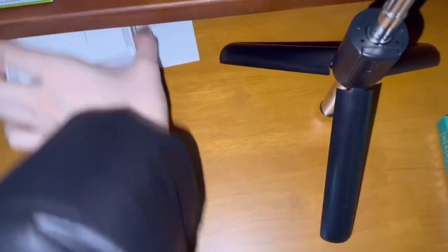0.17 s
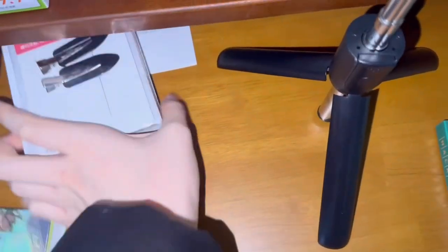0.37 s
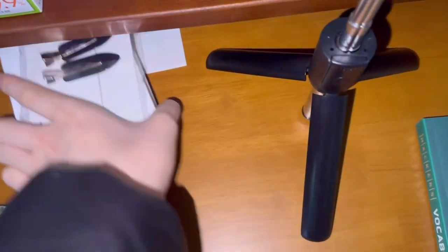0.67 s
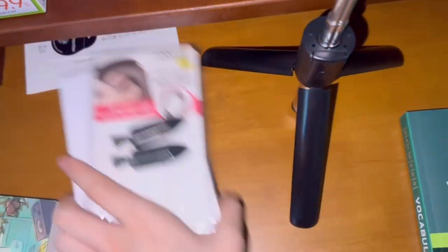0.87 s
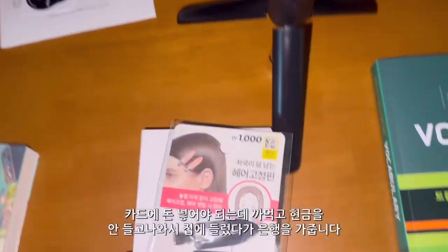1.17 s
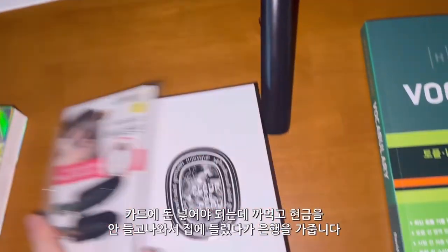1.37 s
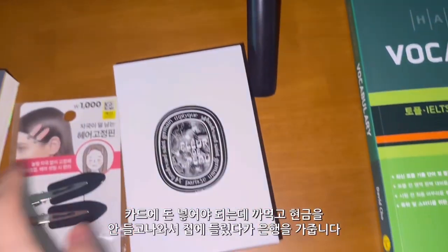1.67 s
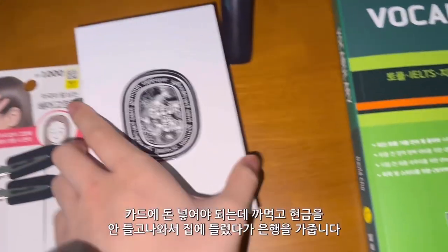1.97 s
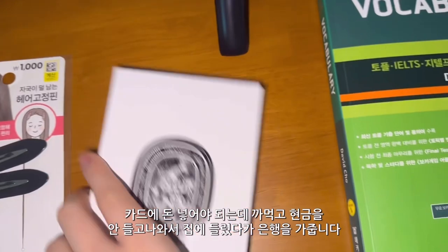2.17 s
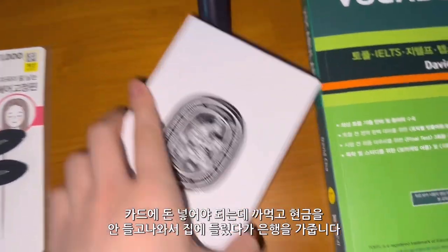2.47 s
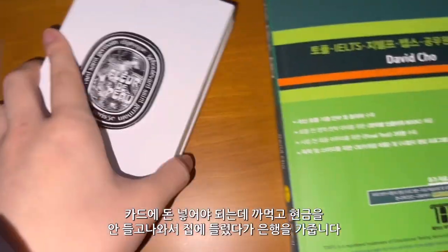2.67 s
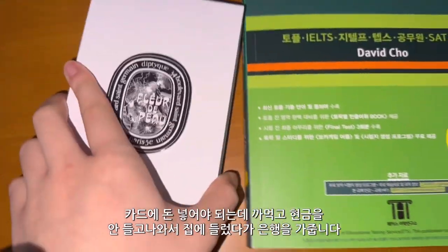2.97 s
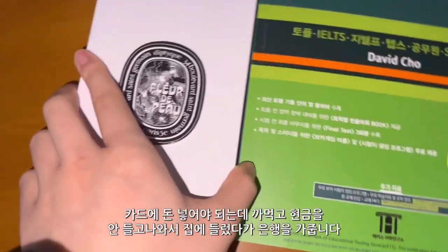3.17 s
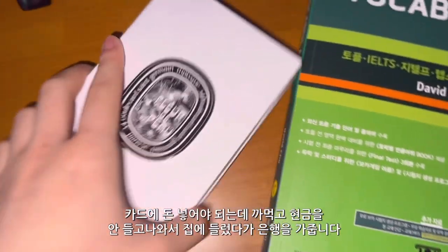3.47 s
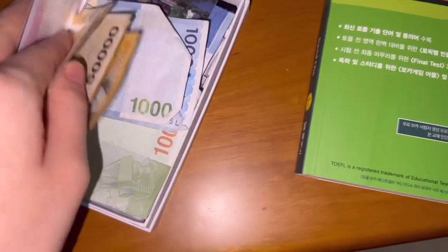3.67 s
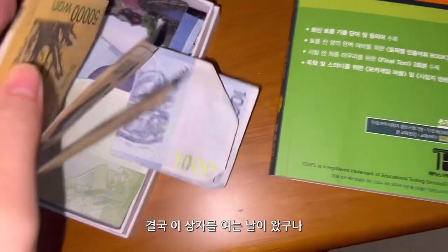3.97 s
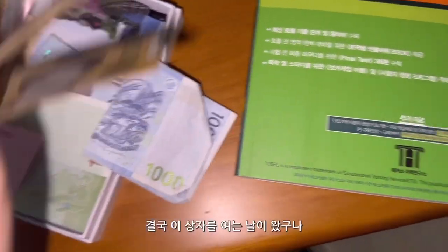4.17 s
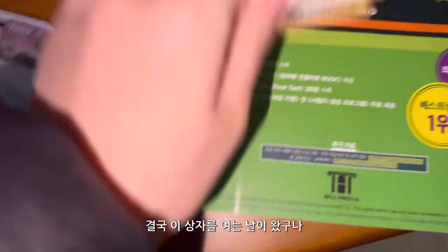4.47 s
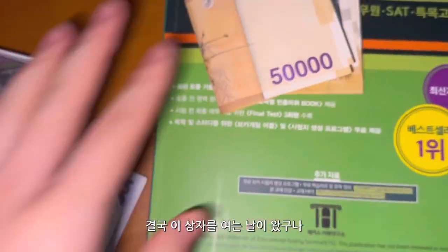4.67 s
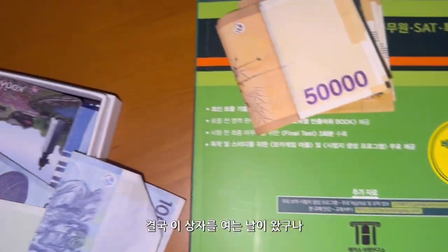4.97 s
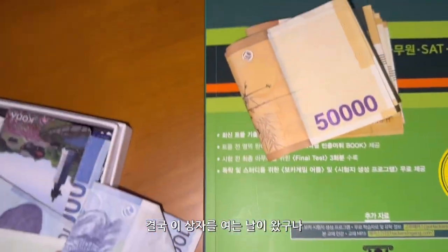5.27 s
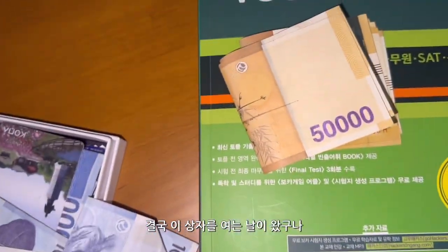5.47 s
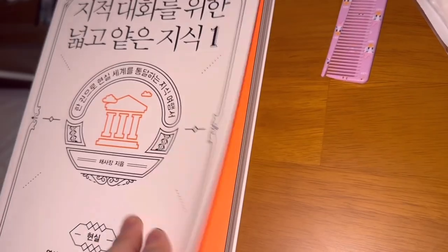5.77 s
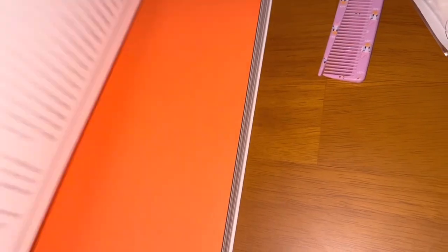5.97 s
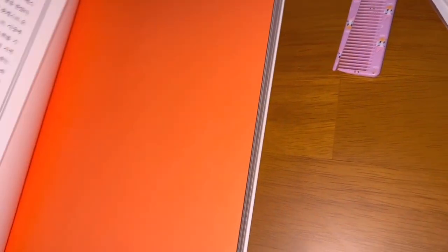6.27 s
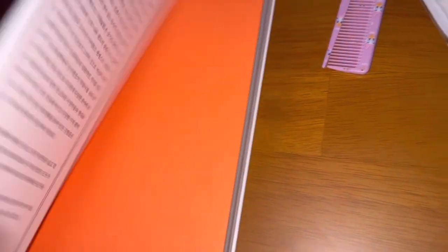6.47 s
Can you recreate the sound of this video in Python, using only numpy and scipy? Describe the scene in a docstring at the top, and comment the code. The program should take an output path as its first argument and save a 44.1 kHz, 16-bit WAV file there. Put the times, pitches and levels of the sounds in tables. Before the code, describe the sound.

Close, dry stereo sound in a quiet furnished room. A nylon sleeve swishes as hands drag a plastic packet and cardboard box across a wooden desk with scrapes, sharp crackles and hollow knocks. The box is knocked about and opened, banknotes slide and flick softly, then after a near-quiet pause a paperback cover turns with low thumps and a papery brush.

```python
"""At a wooden desk in a furnished room, heard close up: hands pull a plastic packet off a small cardboard box,
knock the box about and open it, lift out banknotes, then turn a paperback's cover and first page.
Rubs are crackling slips over a hiss, squeaks are gliding tones, and snaps are filtered bursts with a ring.
Knocks travel through the desk top as falling chirps. A nylon sleeve swishes with the reaches over quiet room tone."""
import sys
import numpy as np
from scipy import signal
from scipy.fft import rfft, irfft, next_fast_len
from scipy.io import wavfile
from scipy.ndimage import uniform_filter1d

SR = 44100
rng = np.random.default_rng(int(sys.argv[2]) if len(sys.argv) > 2 else 0)


def generate_wav(sig):
    """Save sig (samples, or channels by samples) to the path in sys.argv[1] as 16-bit PCM at SR."""
    pcm = np.round(np.clip(np.atleast_2d(sig).T, -1, 1) * 32767).astype(np.int16)
    wavfile.write(sys.argv[1], SR, pcm)


N = 291942  # length in samples


def amp(db):
    """Turns decibels into a gain."""
    return 10 ** (np.asarray(db) / 20)


def unit(x):
    """Scales a sound to an rms of 1."""
    return x / np.sqrt(np.mean(x ** 2) + 1e-20)


def read(points, hz):
    """Reads a table between its rows, on a log-frequency axis."""
    f, value = np.transpose(points)
    return np.interp(np.log(hz + 1), np.log(f), value)


def colour(x, points):
    """Filters a sound by a table of levels over frequency."""
    size = next_fast_len(len(x), True)
    gain = amp(read(points, np.fft.rfftfreq(size, 1 / SR)))
    return irfft(rfft(x, size) * gain, size)[:len(x)]


def causal(gain_db):
    """Minimum-phase spectrum of a gain, so that the sound starts at the blow and not before it."""
    log_gain = np.log(amp(np.maximum(gain_db, -100)))
    both_sides = np.r_[log_gain, log_gain[-2:0:-1]]
    return np.exp(np.conj(signal.hilbert(both_sides)))[:len(log_gain)]


def peak(hz, centre_hz, height_db, width):
    """One resonance, in dB over frequency; the width is a share of its pitch."""
    return height_db / (1 + ((hz / centre_hz - 1) / width) ** 2)


def add(mix, s, sound):
    """Mixes a sound in at time s."""
    part = mix[max(round(s * SR), 0):][:len(sound)]
    part += sound[:len(part)]


def ringing(modes, t):
    """A struck body rings as a sum of decaying sines; the total energy is 1."""
    sound = sum(amp(db - 60 * t / t60) * np.sin(2 * np.pi * hz * t) for hz, db, t60 in modes)
    return sound / np.linalg.norm(sound)


def swell(t, db, rise_s, fall_s, shape):
    """Gain of one stroke, loudest at t = 0; a shape of 1 or less is a sharp peak, 2 a round bell."""
    distance = abs(np.where(t < 0, t / rise_s, t / fall_s))
    return amp(db - 20 * distance ** shape)


def level(strokes, shape):
    """Gain over time of a row of strokes, which add in power."""
    t = np.arange(N) / SR
    coarse = t[::32]
    power = sum(swell(coarse - s, db, rise_s, fall_s, shape) ** 2 for s, db, rise_s, fall_s in strokes)
    return np.interp(t, coarse, np.sqrt(power))


def wander(x, patchy_db, patch_hz):
    """The contact moves, so the resonances of the rubbed surface come and go."""
    z = signal.stft(x, SR, nperseg=1024, noverlap=768)[2]
    field = rng.standard_normal(z.shape)
    # smooth the random map over time (axis 1), then over frequency (axis 0)
    field = uniform_filter1d(uniform_filter1d(field, size=8, axis=1), size=4, axis=1)
    field = unit(uniform_filter1d(field, size=max(round(patch_hz * 1024 / SR), 2), axis=0))
    return unit(signal.istft(z * amp(patchy_db * field), SR, nperseg=1024, noverlap=768)[1][:N])


def rub(strokes, spectrum, shape, slips_per_s, slip_s, spread_db, smooth, flutter_db, patchy_db, patch_hz):
    """Friction: brief crackling slips of uneven size over a smooth hiss, under a hand whose pressure flutters."""
    size = amp(spread_db * np.minimum(rng.exponential(1, N), 4))
    starts = rng.random(N) < slips_per_s / SR
    # each slip dies away over slip_s
    slips = signal.lfilter([1], [1, -np.exp(-1 / (slip_s * SR))], size ** 2 * starts)
    hiss = wander(rng.standard_normal(N), patchy_db, patch_hz)
    texture = unit(colour(hiss * np.sqrt(slips / slips.mean() + smooth ** 2), spectrum))
    pressure = uniform_filter1d(uniform_filter1d(rng.standard_normal(N), size=300), size=200)
    return texture * amp(flutter_db * unit(pressure)) * level(strokes, shape)


def whistle(rows, width_hz, shape, steady, bend_hz_per_s2=0):
    """A gliding tone, part steady and part fuzzy, swells and fades."""
    out = np.zeros(N)
    t = np.arange(-SR // 4, SR // 2) / SR
    narrow = signal.butter(2, width_hz, fs=SR, output="sos")
    for s, db, rise_s, fall_s, hz, glide in rows:
        pitch = np.maximum(hz + glide * t + bend_hz_per_s2 * t ** 2, 0)
        turns = np.cumsum(pitch) / SR
        a, b = rng.standard_normal((2, len(t)))
        fuzz = signal.sosfilt(narrow, a + 1j * b)
        tone = unit(((steady + fuzz / fuzz.std()) * np.exp(2j * np.pi * turns)).real)
        add(out, s + t[0], tone * swell(t, db, rise_s, fall_s, shape))
    return out


# How the desk top rings when struck or rubbed.
# Each row: pitch in Hz, relative level in dB, time to fade by 60 dB in seconds.
MODES_OF_DESK = [(134, -13.5, 0.2), (240, 2.5, 0.14), (345, 2, 0.2), (462, 0, 0.038), (587, -4, 0.09),
                 (810, -4, 0.15)]


def blows(rows, spectrum, walls, own_modes, bounce_width, desk_db, own_db, scatter_s, edge_db, edge_lag):
    """Contacts bounce at a pitch; bending waves arrive treble first, edges scatter them, desk and object ring."""
    out = np.zeros(N)
    t = np.arange(16384) / SR
    hz = np.fft.rfftfreq(len(t), 1 / SR)
    bend = -4j * np.pi * np.sqrt(1000 * hz)  # the delay goes as 1 / sqrt(frequency)
    body_db = read(spectrum, hz) + sum(peak(hz, wall_hz, db, width=.06) for wall_hz, db in walls)
    desk, own = rfft(ringing(MODES_OF_DESK, t)), rfft(ringing(own_modes, t))
    for s, energy_db, tilt_db, ring_db, lag, bounce_hz, bounce_db in rows:
        # one sharp push, followed by faint fading noise: the scattered waves
        push = amp(-38) * rng.standard_normal(len(t)) * np.exp(-t / scatter_s)
        push[0] = 1
        contact_db = body_db + peak(hz, bounce_hz, bounce_db, bounce_width)
        brightness_db = tilt_db * np.log2(np.clip(hz, 80, 2000) / 500)
        wave = rfft(push) * causal(contact_db + brightness_db)
        wave = wave / np.linalg.norm(irfft(wave)) + amp(desk_db) * desk + amp(own_db + ring_db) * own
        # the direct wave, and its return from the nearest edge
        paths = np.exp(bend * lag) * (1 + amp(edge_db) * np.exp(bend * edge_lag))
        sound = irfft(wave * paths)
        add(out, s - lag * .6, amp(energy_db) * sound / np.linalg.norm(sound))
    return out


# Tone of the room's quiet background. Each row: frequency in Hz, relative level in dB.
ROOM_TONE = [(18, -52.5), (30, -16.5), (127, -8), (145, -7), (184, -12), (273, -11), (569, -24),
             (1350, -32), (1910, -20), (6550, -39.5), (9460, -49), (16000, -62.5)]


def room_tone():
    """The quiet background of the room is steady noise, strongest in the bass."""
    return amp(-70) * unit(colour(rng.standard_normal(N), ROOM_TONE))


# Reaches of the arm in its nylon sleeve. Each row: loudest moment in seconds, relative level in dB,
# rise in seconds, fall in seconds (rise and fall are the times for 20 dB).
SLEEVE = [(0.21, -42, 0.2, 0.17), (0.51, -46.5, 0.029, 0.067), (0.86, -43.5, 0.29, 0.51),
          (1.57, -59.5, 0.046, 0.19), (1.84, -44.5, 0.16, 0.17), (2.04, -44, 0.081, 0.26),
          (2.35, -53, 0.12, 0.091), (2.54, -47, 0.36, 0.2), (2.8, -51, 0.13, 0.043), (3.12, -46, 0.52, 1),
          (3.35, -50, 0.22, 0.043), (4.35, -47.5, 0.22, 0.23), (4.55, -55, .07, 0.15),
          (4.79, -54.5, 0.3, 0.19), (5.13, -65.5, .2, .25), (5.36, -62, 0.23, 0.16),
          (5.48, -56.5, 0.14, .025), (5.74, -59, .045, 0.22), (6.35, -55.5, 0.11, 0.21),
          (6.6, -64, 0.1, .1)]
# Overall tone of the nylon swish as heard, with a gap near 12.8 kHz.
# Each row: frequency in Hz, relative level in dB.
NYLON = [(200, -22.5), (500, -9), (900, -7.5), (1300, -8), (3900, -5), (4900, -8), (5900, -2), (8400, -5.5),
         (10500, -11), (12800, -43), (14600, -16), (16000, -15.5)]
# The ribbed nylon sings as the sleeve slows. Each row: loudest moment in seconds, level in dB,
# rise in seconds, fall in seconds, pitch at the loudest moment in Hz, glide there in Hz per second.
WEAVE = [(3.284, -51.5, .03, .25, 4500, -8500)]


def sleeve():
    """Nylon rubs on nylon in a dense swish of tiny slips; its ribs sing once as a falling tone."""
    swish = rub(SLEEVE, NYLON, shape=1.6, slips_per_s=11000, slip_s=.0001, spread_db=0.0,
                smooth=0.73, flutter_db=0.75, patchy_db=3.0, patch_hz=400)
    return amp(2.0) * swish + whistle(WEAVE, width_hz=73, shape=1.6, steady=1.3, bend_hz_per_s2=-75000)


# The box skids on the desk. Each row: loudest moment in seconds, level in dB,
# rise in seconds, fall in seconds (times for 20 dB).
SKID = [(0.693, -33.5, 0.038, 0.11), (0.8, -34, 0.062, 0.089), (1.06, -29, 0.047, 0.038),
        (1.135, -44, 0.037, 0.09), (2.03, -36.5, .015, 0.075), (2.22, -51.5, 0.17, 0.16)]
# How the lid of the box hums. Each row: pitch in Hz, relative level in dB, time to fade by 60 dB in seconds.
MODES_OF_LID = [(336, 0.5, .05), (564, -2.5, 0.06), (840, -1, 0.049), (1095, -11, 0.035)]


def skid(shape):
    """Friction under the box keeps the modes of its lid ringing."""
    lid = ringing(MODES_OF_LID, np.arange(SR // 4) / SR)
    hum = signal.fftconvolve(rng.standard_normal(N), lid)[:N]
    return unit(hum) * level(SKID, shape)


# Pushes of box, packet and book over the wood. Each row: loudest moment in seconds, relative level in dB,
# rise in seconds, fall in seconds (times for 20 dB).
SLIDE = [(0.15, -38, 0.15, 0.082), (0.335, -31.5, 0.11, 0.081), (0.473, -29, 0.016, 0.094),
         (0.76, -36.5, 0.2, 0.57), (0.862, -29.5, 0.015, 0.16), (0.96, -33, .014, 0.029),
         (1.09, -37.5, 0.1704, 0.13), (1.285, -39, 0.078, 0.0093), (1.45, -35.5, .1, 0.11),
         (1.6, -53.5, .2, 0.27), (1.89, -41, 0.27, 0.11), (1.984, -33, 0.014, 0.17),
         (2.27, -45.5, .35, 0.91), (2.461, -41, 0.046, 0.19), (2.78, -40.5, 0.31, 0.31),
         (2.805, -35, .015, 0.13), (3.116, -40, 0.13, 0.19), (3.4, -53.5, 0.52, 0.44),
         (4.45, -55.5, 0.81, 0.36), (4.85, -60, .4, 0.33), (5.09, -41, 0.035, 0.072),
         (6.365, -50, 0.017, 0.068), (6.46, -39.5, 0.026, 0.011)]
# Overall tone of a rub on wood. Each row: frequency in Hz, relative level in dB.
WOOD_RUB = [(25, -38.5), (50, 1.5), (120, 3), (200, -1), (330, 4), (550, -3.5), (850, -5.5), (1300, -8),
            (2500, -15), (5000, -50)]
# An edge of the packet or the box judders over what lies under it. Each row: loudest moment in seconds,
# level in dB, rise in seconds, fall in seconds, pitch at the loudest moment in Hz, glide in Hz per second.
JUDDER = [(1.106, -26, .035, .04, 400, -1800), (2.9, -36, .015, .07, 385, -800)]


def slide():
    """Things pushed over the wood slip slowly and coarsely; the desk hums, edges judder and the box skids."""
    wood = amp(-1.5) * rub(SLIDE, WOOD_RUB, shape=1.26, slips_per_s=180, slip_s=0.0025, spread_db=3,
                           smooth=.8, flutter_db=0.0, patchy_db=4.5, patch_hz=150.6)
    desk_ring = ringing(MODES_OF_DESK, np.arange(SR // 4) / SR)
    desk_hum = amp(-37) * signal.fftconvolve(wood, desk_ring)[:N]
    judder = whistle(JUDDER, width_hz=60, shape=0.9, steady=.9)
    return wood + desk_hum + judder + skid(shape=1.1)


# The bending cover rumbles. Each row: loudest moment in seconds, relative level in dB,
# rise in seconds, fall in seconds (times for 20 dB).
COVER = [(5.68, -60, .03, 0.11), (5.98, -46, 0.087, 0.2), (6.41, -44.5, 0.19, .06),
         (6.62, -38.5, 0.088, .1)]
# Dull tone of the book, for its rumble and for flops onto it. Each row: frequency in Hz, relative level in dB.
BOOK = [(25, -22), (60, 3.5), (130, 1.5), (200, -1.5), (340, -10.5), (520, -20.5), (720, -24), (1500, -56),
        (8000, -99)]


def cover():
    """The bending cover gives way in few, very uneven slips, heard as a low rumble."""
    return amp(-1.0) * rub(COVER, BOOK, shape=1.25, slips_per_s=230, slip_s=0.0009, spread_db=9.5,
                           smooth=0.55, flutter_db=0, patchy_db=0.5, patch_hz=100)


# Banknotes, the soft cover and pages flop down on a book. Each row: time in seconds, relative level in dB,
# brightness in dB per octave, extra ring of the book in dB.
FLOPS = [(4.526, -20.5, 0, 15), (4.845, -42, 5, -14), (5.699, -26, 16, -11.5), (5.748, -28.5, 10.5, -26),
         (5.97, -16.5, -0.5, -20), (6.068, -29.5, 21.5, -7), (6.224, -24.5, 7.5, -11),
         (6.352, -17.5, 15.5, -31), (6.4418, 6.5, -1, -22), (6.466, -8.5, 5.5, -18), (6.482, -5, -16, 4),
         (6.494, -12, -10, 10), (6.548, -12, 6, 11)]
# The contact, alike for every flop: travel time of a 1 kHz wave in seconds, bounce in Hz, its strength in dB.
BOOK_CONTACT = (0.00331, 149, 1.46)
# How the book rings. Each row: pitch in Hz, relative level in dB, time to fade by 60 dB in seconds.
MODES_OF_BOOK = [(159, 11, 0.12), (367, -3.5, 0.084)]


def flops():
    """Soft sheets land on the book: dull blows, with the book's own low ringing."""
    rows = [(*row, *BOOK_CONTACT) for row in FLOPS]
    return amp(1.5) * blows(rows, BOOK, [], MODES_OF_BOOK, bounce_width=0.2, desk_db=-35, own_db=9,
                            scatter_s=0.042, edge_db=-10.0, edge_lag=0.00422)


SHEET_PATCHY_DB = 3.3  # how unevenly a rubbed sheet's resonances come and go

# Pages brush past the thumb and each other. Each row: loudest moment in seconds, relative level in dB,
# rise in seconds, fall in seconds (times for 20 dB).
PAGES = [(5.708, -61, 0.064, 0.028), (5.9, -40, 0.08, 0.097), (5.921, -40, .03, 0.0064),
         (5.965, -48.5, .04, .015), (6.04, -66.5, 0.094, 0.34), (6.228, -56.5, 0.0095, 0.29),
         (6.448, -49, 0.016, 0.1), (6.536, -40, 0.0066, 0.07), (6.556, -48, .03, 0.19)]
# Overall tone of the brushing pages as heard, with a gap near 12.5 kHz.
# Each row: frequency in Hz, relative level in dB.
PAPER = [(240, 7), (500, -1.5), (1100, 5), (2600, 1.5), (4400, 4), (5100, -3), (6400, 3.5), (9500, -6),
         (12500, -22), (16000, -10)]


def pages():
    """Paper brushes by in sharp-peaked strokes of hiss and fine crackle."""
    return amp(0.5) * rub(PAGES, PAPER, shape=0.68, slips_per_s=750, slip_s=0.00038, spread_db=1.5,
                          smooth=1.0, flutter_db=2.0, patchy_db=SHEET_PATCHY_DB, patch_hz=400)


# Banknotes slide over one another. Each row: loudest moment in seconds, relative level in dB,
# rise in seconds, fall in seconds (times for 20 dB).
NOTES = [(3.54, -61, 0.004, 0.042), (3.66, -41, 0.034, 0.05), (3.703, -41.5, 0.014, 0.048),
         (3.755, -42, 0.065, 0.11), (3.834, -33, 0.014, 0.1), (3.868, -36, 0.031, 0.034),
         (3.935, -43.5, 0.064, 0.29), (3.993, -38, 0.02, 0.031), (4.526, -35.5, 0.02, 0.026),
         (4.8, -38, 0.013, 0.021), (4.925, -45.5, 0.049, 0.067), (5.042, -35.5, 0.067, 0.027),
         (5.086, -30.5, 0.036, 0.052)]
# Overall tone of the sliding banknotes as heard, with a gap near 13 kHz.
# Each row: frequency in Hz, relative level in dB.
BANKNOTE = [(240, -25), (600, -12.5), (1000, -5), (1400, -6.5), (2050, -7), (2650, -2.5), (3300, -7),
            (4900, -7.5), (6900, -5.5), (10400, -16), (13000, -42), (16000, -16)]
# Banknotes and pages resonate as they bend and slide. Each row: loudest moment in seconds, level in dB,
# rise in seconds, fall in seconds, pitch at the loudest moment in Hz, glide in Hz per second.
FLEX = [(3.86, -40.5, 0.04, 0.046, 1655, -1000), (3.85, -43, 0.03, 0.031, 3610, -9000),
        (4.01, -39.5, 0.027, 0.037, 1240, 5), (5.085, -28, 0.005, 0.012, 2250, -3000),
        (5.905, -43.5, 0.025, 0.027, 4250, 5), (5.92, -38.5, .025, 0.0076, 6300, 3)]


def notes():
    """Banknotes rub with short slips; bent notes and pages add fuzzy gliding resonances."""
    sliding = rub(NOTES, BANKNOTE, shape=0.79, slips_per_s=1000, slip_s=.00025, spread_db=1.0,
                  smooth=0.61, flutter_db=1.5, patchy_db=SHEET_PATCHY_DB, patch_hz=550)
    return amp(-2.5) * sliding + whistle(FLEX, width_hz=220, shape=1.3, steady=.2)


# The plastic packet is flexed and dragged. Each row: loudest moment in seconds, relative level in dB,
# rise in seconds, fall in seconds (times for 20 dB).
PACKET = [(0.463, -40, 0.026, 0.012), (1.045, -27.5, 0.1, 0.096), (1.138, -30.5, 0.027, 0.032),
          (1.268, -31, 0.16, 0.13), (1.375, -28, 0.035, 0.011), (1.42, -23.5, 0.0067, 0.099)]
# Overall tone of the plastic crackle as heard, with a gap near 12.8 kHz.
# Each row: frequency in Hz, relative level in dB.
PLASTIC = [(300, -3.5), (700, -3), (1400, 7), (2400, 3.5), (4000, 2), (4950, 1), (6300, 2.5), (8000, 0.5),
           (10700, -8), (12800, -24), (15500, -10)]
# Short high tones: packet edges squeak, and the knocked box rings once at 2.6 kHz (last row).
# Each row: loudest moment in seconds, level in dB, rise in seconds, fall in seconds,
# pitch at the loudest moment in Hz, glide in Hz per second.
HIGH_TONES = [(0.455, -38, 0.013, 0.013, 2150, -3000), (1.055, -36, 0.034, 0.087, 2820, -4500),
              (1.128, -27, 0.014, 0.017, 2195, -3500), (2.837, -36, .008, .015, 2570, -2.5)]


def packet():
    """Flexed plastic crackles in slips of very uneven size; its edges squeak, and the knocked box rings once."""
    crackle = rub(PACKET, PLASTIC, shape=1.54, slips_per_s=1000, slip_s=0.00045, spread_db=5.0,
                  smooth=0.66, flutter_db=2.0, patchy_db=SHEET_PATCHY_DB, patch_hz=400)
    return amp(-6.5) * crackle + whistle(HIGH_TONES, width_hz=140, shape=1.2, steady=.4)


# Crisp snaps of plastic, card and paper. Each row: time of the click in seconds, relative level in dB,
# centre in Hz, ring of the buckled patch in Hz, time for the burst to fade by 60 dB in seconds.
SNAPS = [(0.3146, -7.5, 2800, 2830, 0.011), (0.3238, -4, 3000, 2260, 0.016),
         (0.3537, -9.5, 3550, 5460, 0.011), (0.4594, -5.5, 2860, 1830, 0.028),
         (0.4694, -0.5, 4560, 6540, 0.0092), (0.544, -8.5, 5840, 6400, 0.0042),
         (0.558, -15, 4460, 5700, 0.0052), (0.5973, -9.5, 6000, 5700, 0.0063),
         (0.6083, -10.5, 6400, 5500, 0.0069), (0.6972, -4.5, 3560, 3940, 0.014),
         (0.839, -0.5, 5870, 6640, 0.0013), (0.8462, 0, 4340, 4280, 0.018),
         (0.8562, -10, 3500, 1120, 0.011), (0.9894, 3.5, 4050, 3480, 0.0064),
         (1.0012, 0.5, 2380, 1760, 0.021), (1.0207, -1, 3400, 3000, 0.005),
         (1.0388, 0.5, 3340, 2370, 0.019), (1.0498, -5, 3570, 2760, .006), (1.0675, -8, 3500, 2630, 0.0099),
         (1.0835, 6.5, 5260, 6100, 0.0062), (1.118, -5.5, 5600, 6500, .004), (1.1222, 2, 3470, 2400, 0.008),
         (1.1258, 2, 5560, 6760, 0.0052), (1.1398, -3.5, 4800, 5600, 0.0045),
         (1.1434, 0.5, 4150, 2110, 0.0055), (1.2162, 6, 5340, 7040, 0.0032), (1.2462, 2, 3650, 1840, 0.011),
         (1.2609, 3.5, 4040, 3660, 0.015), (1.2715, 16.5, 6400, 7200, 0.0019),
         (1.286, 5, 4870, 3270, 0.0057), (1.297, 3, 5700, 5200, 0.012), (1.347, 1.5, 5040, 5360, 0.02),
         (1.376, 5, 4080, 3970, 0.0095), (1.3798, 5, 3970, 3120, 0.0065), (1.4009, 5.5, 5800, 6440, 0.0049),
         (1.4096, 9.5, 5330, 6120, 0.0057), (1.4431, 5.5, 3840, 6300, 0.011),
         (1.4577, 1.5, 4940, 5600, 0.0071), (1.4682, -4, 5700, 6090, 0.008),
         (1.5026, -5, 4100, 5700, 0.0088), (1.9771, -9.5, 3120, 1590, 0.06),
         (2.3258, -3, 3560, 1140, 0.023), (2.4452, 0, 2520, 2720, 0.023), (2.7871, 6.5, 3170, 3860, 0.012),
         (2.7908, 12.5, 2280, 2440, 0.0041), (3.101, 0, 2600, 1100, 0.014),
         (3.5341, -5.5, 2700, 2260, 0.028), (3.5797, -13.5, 2900, 1820, 0.0044),
         (3.6695, -17.5, 1800, 1310, 0.017), (3.7362, -11.5, 3490, 6420, 0.017),
         (3.8242, -12, 3550, 3410, 0.029), (3.8405, -11, 2600, 1950, .004),
         (3.868, -14.5, 2800, 3630, 0.0044), (3.928, -10, 2540, 3210, 0.018),
         (3.9425, -14.5, 1990, 1560, 0.0067), (3.9871, -3.5, 2640, 2920, 0.009),
         (4.0116, -6.5, 2190, 1290, 0.0046), (4.0212, -1.5, 2220, 2670, 0.003),
         (4.0732, -12.5, 2500, 2960, 0.0074), (4.505, -6.5, 4970, 5670, 0.013),
         (4.5185, -3.5, 2900, 2420, 0.02), (4.5973, -20.5, 3480, 3970, 0.0045),
         (4.7974, -24, 4560, 5660, 0.013), (4.812, -23, 4300, 5330, 0.0085),
         (4.8459, -12.5, 6130, 7550, 0.008), (4.9551, -20, 3850, 3720, 0.0067),
         (5.0407, -8, 3880, 3450, 0.008), (5.0741, -4, 5240, 6400, 0.012),
         (5.0828, -4.5, 2700, 2280, 0.0083), (5.1371, -13, 5600, 5770, 0.011),
         (5.5448, -27, 5330, 6300, 0.0037), (5.6983, -25, 4590, 5500, 0.0084),
         (5.704, -23, 5200, 5740, .004), (5.715, -23, 5450, 6270, 0.003), (6.4429, -19, 4100, 4440, 0.012),
         (6.6095, -16, 4570, 4130, 0.013)]
# Overall tone shared by all snaps as heard, with a gap near 13 kHz.
# Each row: frequency in Hz, relative level in dB.
SNAP_COLOUR = [(150, 1), (700, 4), (2000, 0), (4200, -6), (5000, -9.5), (5700, -3), (7200, -3.5),
               (8500, -8), (11000, -11), (13000, -31), (15000, -7)]


def snaps(focus_db, crumple, before_db, before_s, after_db, shiver, ring_db, ring_width, pure_s):
    """A snap swells in very briefly, clicks and bursts, then shivers; the buckled patch rings, purer if quick."""
    out, lead = np.zeros(N), 256
    t = np.arange(-lead, 4096 - lead) / SR
    hz = np.fft.rfftfreq(len(t), 1 / SR)
    for s, energy_db, centre_hz, ring_hz, t60 in SNAPS:
        lead_in = amp(before_db) * np.exp(-abs(t) / before_s)
        burst = crumple * amp(-60 * abs(t) / t60)
        shivering = amp(after_db) * np.exp(-abs(t) / (shiver * t60))
        push = rng.standard_normal(len(t)) * np.where(t < 0, lead_in, burst + shivering)
        push[lead] = 1  # the click
        # the level drops away on both sides of the centre
        shape_db = read(SNAP_COLOUR, hz) - focus_db * np.hypot(np.log2((hz + 1) / centre_hz), .3)
        purity = 1 + np.exp(-(t60 / pure_s) ** 2) * 2
        patch_db = peak(hz, ring_hz, ring_db * purity, ring_width)
        sound = irfft(rfft(push) * causal(shape_db + patch_db))
        add(out, s + t[0], amp(energy_db) * sound / np.linalg.norm(sound))
    return out


# Knocks on the desk top. Each row: time in seconds, relative level in dB, brightness in dB per octave,
# extra ring of the box in dB, travel time of a 1 kHz bending wave to the microphone in seconds,
# bounce of the contact in Hz, its strength in dB.
KNOCKS = [(0.3235, -2.5, 6.5, -29, .003, 560, 4), (0.3546, -0.5, -6.5, -33, .0035, 307, 3),
          (0.402, -9, -1.5, -27, .004, 310, 5), (0.4695, 6, 0.5, -31.5, .002, 797, 15.5),
          (0.688, -7.5, 6.5, -26.5, .004, 343, 17.5), (0.8112, 3, 4, -16.5, 0.0011, 723, 6.5),
          (0.8458, 8.5, 5.5, -18, .005, 700, 12.5), (0.8565, 12, 5.5, -18, 0.00059, 1600, 2.5),
          (0.8585, 9, -5.5, -13.5, 0.0036, 278.4, -0.5), (0.8955, -1, 7.5, -21.5, .003, 720, 7.5),
          (0.9495, -1.5, -4.5, -23.5, .005, 120, 3), (1.002, -2, 7, -23, .002, 1110, 1.5),
          (1.0835, 1, -0.5, -21.5, 0.0019, 620, 20), (1.1765, -1, 6.5, -17.5, 0.0031, 510, 14),
          (1.298, -6.5, 3.5, -13.5, 0.0023, 1300, 10.5), (1.443, -1, 11.5, -19, 0.0015, 1430, 12),
          (1.876, -8, -2, -20, 0.0036, 490, 20), (1.903, -0.5, 1.5, -10, 0.0014, 840, 7.5),
          (1.9785, -0.5, 10.5, -7, 0.0036, 504, 24.5), (2.3254, 10.5, 2.5, -28, .0045, 790, 11),
          (2.331, 12.5, -3.5, -23.5, .003, 290, 6), (2.3409, -4, 8.5, -16.5, 0.0021, 290, 5.5),
          (2.4452, 5.5, -1, 6, .003, 450, 9), (2.677, -6.5, 3, -23, .004, 395, 8),
          (2.707, -11, 5.5, -20.5, 0.0018, 600, 1.5), (2.781, -1, -1, -24, 0.0018, 400, 7.5),
          (2.7888, 20.5, 3, -23.5, .003, 460, 11.5), (2.805, -4.5, 4, -20.5, 0.0018, 700, 4.5),
          (2.8165, -3.5, -2, -21, 0.0019, 480, 4.5), (2.8305, 6, 0, -13.5, 0.0017, 386, 15.5),
          (2.8813, 3.5, 6, -27, .003, 420, 14.5), (3.05, -8.5, 3.5, -24, 0.0027, 590, 14),
          (3.1005, 7, 4, -19, .003, 390, 8), (3.104, 0.5, -8.5, -20, 0.0021, 120, -3),
          (3.258, -13, 3.5, -23, .003, 530, 14), (4.525, -13, -7, 2.5, .004, 251, 9),
          (5.093, -11.5, 3, -29, .004, 596, 11)]
# Overall tone of a knock on the desk. Each row: frequency in Hz, relative level in dB.
DESK = [(30, -31), (60, -18.5), (135, 4), (185, -9.5), (250, 8), (460, 1.5), (640, 0), (780, -4.5),
        (1050, -12.5), (1900, -21), (4000, -32.5), (5500, -38.5), (16000, -75)]
# Resonances of the cardboard walls, which colour every knock. Each row: pitch in Hz, height in dB.
BOX_WALLS = [(780, 6), (1110, 8.5), (1480, 2.5), (1880, 7.5), (2680, 4.5)]
# How the box rings. Each row: pitch in Hz, relative level in dB, time to fade by 60 dB in seconds.
MODES_OF_BOX = [(299, -8.5, 0.28), (1266, -1, 0.068), (1510, -3.5, 0.1), (2620, -10.5, 0.08)]


def knocks():
    """Contacts strike the desk top, which carries them as falling chirps while desk and box ring."""
    return amp(-1.7) * blows(KNOCKS, DESK, BOX_WALLS, MODES_OF_BOX, bounce_width=.2, desk_db=-10.5, own_db=-7.5,
                             scatter_s=0.018, edge_db=-29.5, edge_lag=0.003021)


# How long the room's echo lasts. Each row: frequency in Hz, time to fade by 60 dB in seconds.
ROOM_T60 = [(100, 0.58), (400, 0.098), (1000, 0.049), (3000, 0.37), (8000, 0.34), (16000, 0.096)]


def room(x, near_db, tail_db):
    """Direct sound, close reflections that differ between the channels, and a short furnished-room tail."""
    taps = rng.standard_normal((2, SR // 2))
    hz, t, z = signal.stft(taps, SR, nperseg=256)
    fade = amp(-60 * t / read(ROOM_T60, hz)[:, None])
    tail = signal.istft(z * fade, SR, nperseg=256)[1]
    tail[:, :SR // 200] = 0  # the tail waits 5 ms
    wet = signal.fftconvolve(x[None], tail / np.linalg.norm(tail[0]), axes=1)[:, :N]
    near = rng.standard_normal(SR // 100) * np.exp(-np.arange(SR // 100) / SR / 0.0013)
    near[:SR // 2000] = 0  # the nearest surface is a hand's width away
    close = signal.fftconvolve(x, near / np.linalg.norm(near))[:N]
    side = close * amp(near_db) + amp(tail_db) * wet[1] / 2
    # long waves reach both channels alike; each row: frequency in Hz, gain in dB
    side = colour(side, [(100, -10.5), (280, -2), (600, 9.5), (3000, 4), (8000, -6.5), (16000, -9)])
    return x + amp(tail_db) * wet[0] + np.array([side, -side])


def scene():
    """Rubbing, snapping and knocking over quiet room tone, in three groups with their own room echo."""
    crisp = amp(-4.0) * snaps(focus_db=9.0, crumple=0.49, before_db=-26.5, before_s=0.0013, after_db=-23.0,
                              shiver=1.9, ring_db=5, ring_width=0.1, pure_s=.003)
    background = room(room_tone() + sleeve() + slide(), near_db=-10.5, tail_db=-16.0)
    sheets = room(pages() + notes() + packet() + crisp, near_db=-16.0, tail_db=-21.5)
    thumps = room(cover() + flops() + knocks(), near_db=-17.5, tail_db=-21.5)
    return background + sheets + thumps


# Stereo width over frequency: narrow in the bass, very wide near 12.5 kHz.
# Each row: frequency in Hz, level in dB of the difference signal against the shared sound.
STEREO_WIDTH = [(100, -50), (900, -36), (4000, -7.5), (5000, 2), (5600, -27), (8000, -5), (10000, 2.5),
                (12500, 26.5), (15500, 9)]


def record(dry):
    """A phase-turned copy, added left and subtracted right, widens the sound; then low cut, clip and band limit."""
    quarter_turn = signal.hilbert(dry.mean(0)).imag
    side = colour(quarter_turn, STEREO_WIDTH)
    low_cut = signal.butter(3, 42, "high", fs=SR, output="sos")
    pair = signal.sosfilt(low_cut, dry + np.array([side, -side]))
    band_limit = signal.firwin(511, 16300, window=("kaiser", 9), fs=SR)
    return signal.oaconvolve(np.clip(pair, -1, 1), band_limit[None], "same")


dry = scene()
out = record(dry)
generate_wav(out)
```